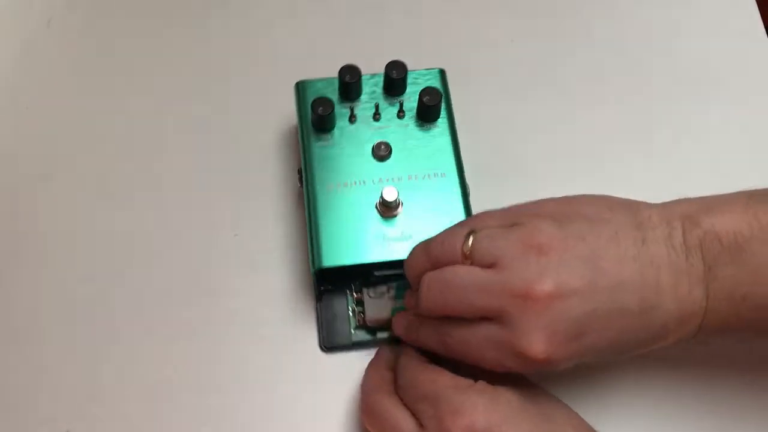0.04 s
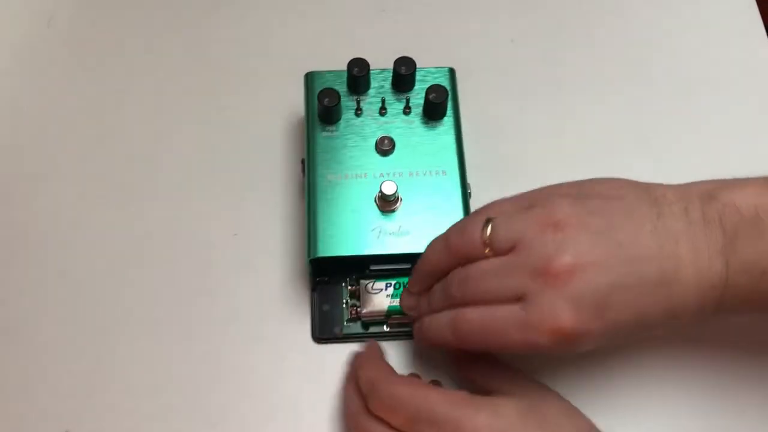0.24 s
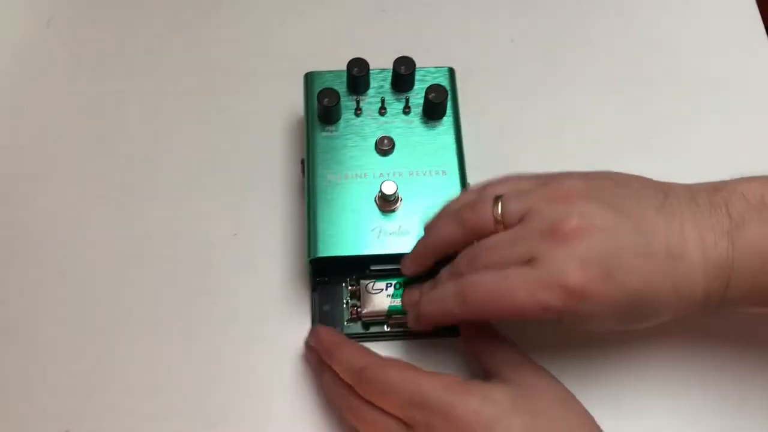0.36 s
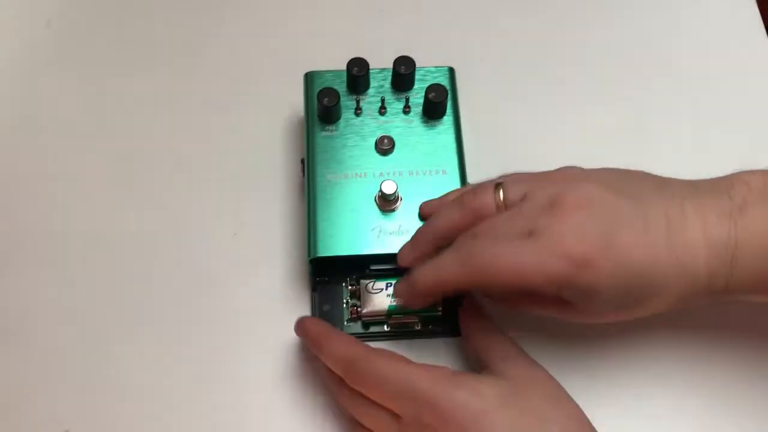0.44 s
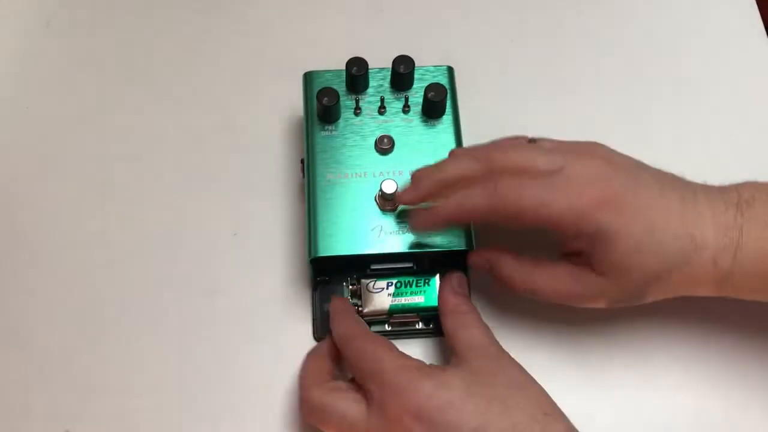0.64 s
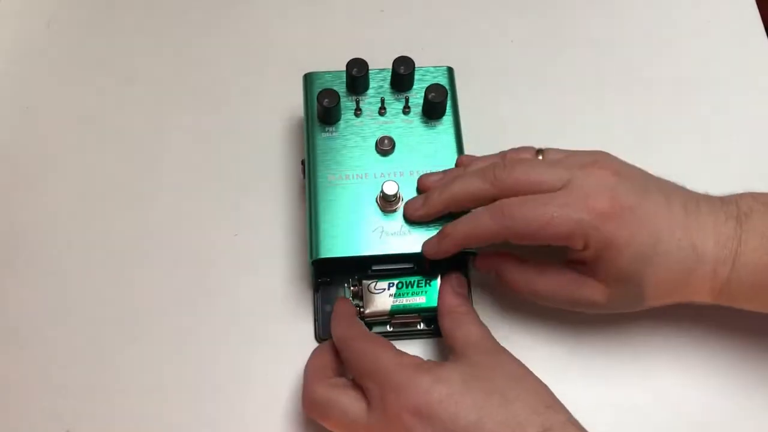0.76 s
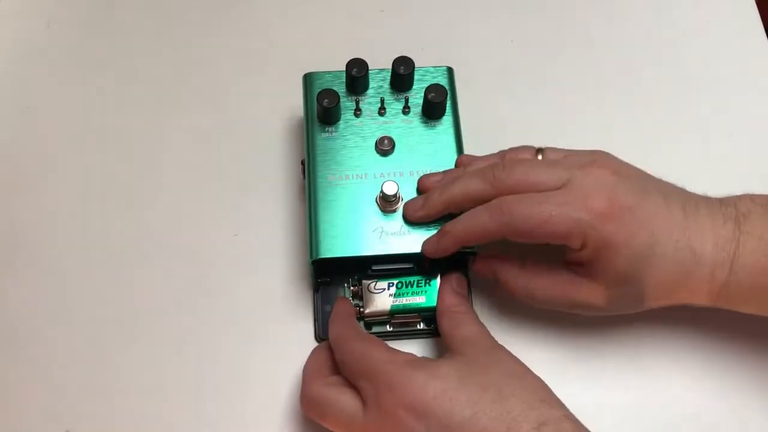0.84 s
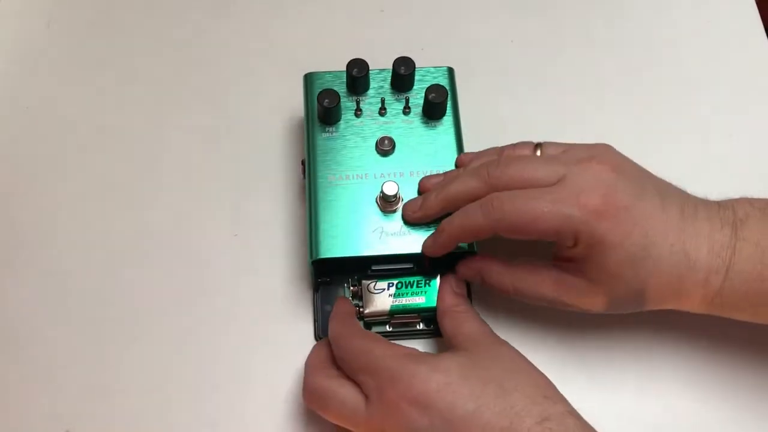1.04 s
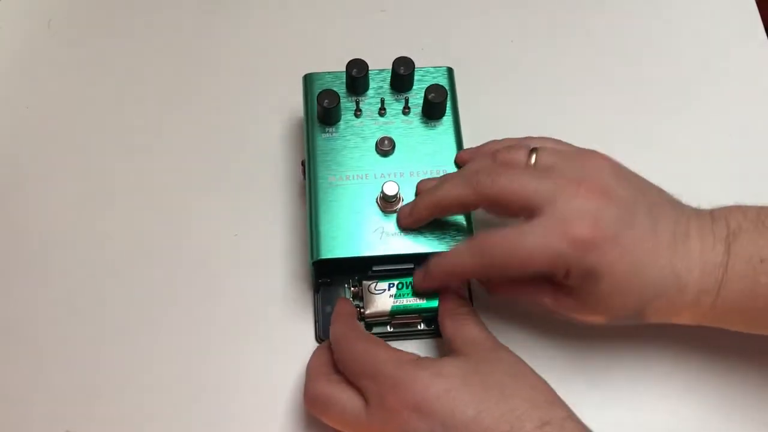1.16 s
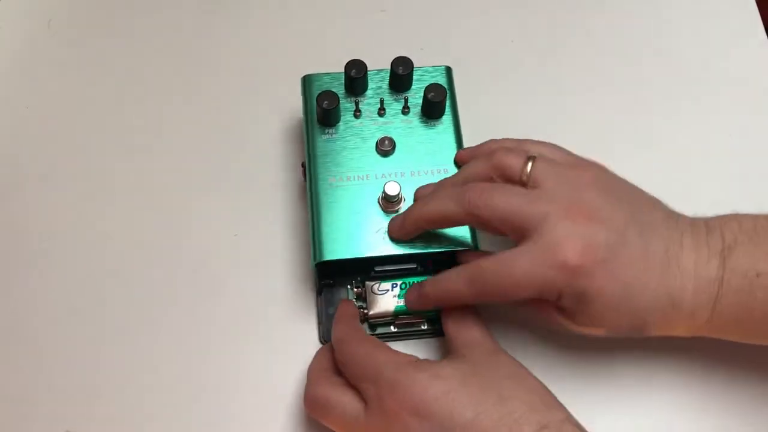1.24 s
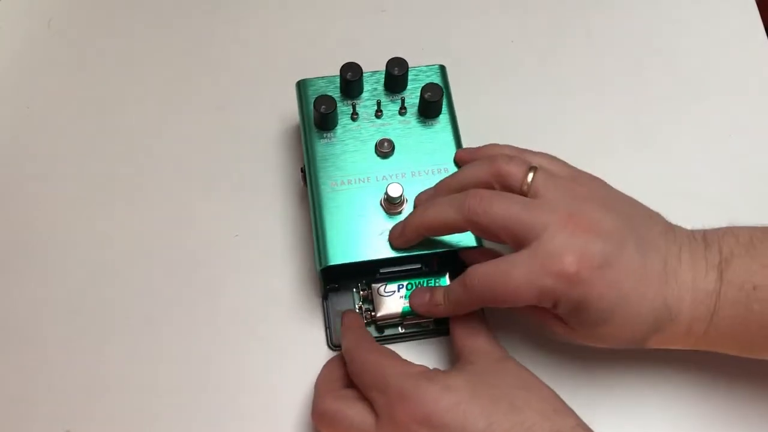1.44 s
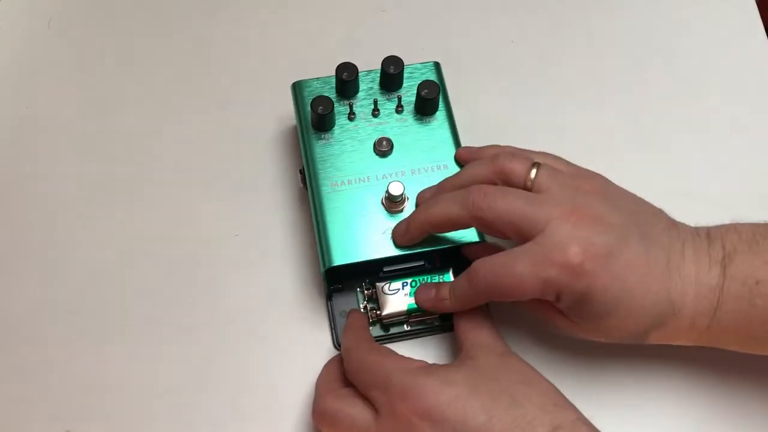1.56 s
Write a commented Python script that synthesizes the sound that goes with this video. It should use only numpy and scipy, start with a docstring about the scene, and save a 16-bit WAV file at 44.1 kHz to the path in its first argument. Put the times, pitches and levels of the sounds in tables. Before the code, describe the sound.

A small battery snaps into a plastic tray with sharp clicks, then faint ticks and rubbing

```python
"""Fingers press a small battery into the plastic tray of a metal box on a table, in a quiet small room.
Room tone and rubbing fingertips (shaped noise) come first, over the rumble of hands on the table top.
Two sharp snaps follow in the first quarter second, then lighter ticks: decaying noise through the tray,
a short ping and ringing housing modes, all with room sound. Soft thuds are decaying sines.
From 0.4 to 0.92 s the box slides a little: uneven noise through resonances."""
import sys
import numpy as np
from scipy import signal
from scipy.fft import rfft, irfft, next_fast_len
from scipy.io import wavfile
from scipy.ndimage import map_coordinates

SR = 44100
rng = np.random.default_rng(int(sys.argv[2]) if len(sys.argv) > 2 else 0)


def store_pcm(level_fs):
    """Save levels as 16-bit WAV."""
    pcm = np.round(np.clip(level_fs, -1, 1) * 32767).astype(np.int16)
    wavfile.write(sys.argv[1], SR, np.atleast_2d(pcm).T)


def ratio(d):
    """dB to gain"""
    e = np.asarray(d, float) / 20
    return 10 ** e


N = 70560  # samples, 1.6 s

# Color of the room tone. Each row: frequency in Hz, relative level in dB.
AIR_COLOR = [(15, -49.5), (25, -28.5), (66, -1.5), (113, -25.5), (152, -9.5), (410, -33), (445, -20),
             (495, -45), (826, -28.5), (1240, -38.5), (12500, -48.5), (15500, -57.5)]
# Loudness of fingertips on plastic and metal. Each row: time in seconds, level in dB.
RUB_LEVEL = [(0, -63.5), (.04, -74), (.06, -50.5), (.14, -54), (.19, -61), (.205, -46), (.23, -60),
             (.33, -62), (.48, -64.5), (.56, -58.5), (.64, -57.5), (.7, -60.5), (.8, -71.5), (.9, -77.5),
             (.96, -72.5), (1, -77), (1.1, -79.5), (1.14, -68), (1.17, -74.5), (1.2, -66), (1.23, -77.5),
             (1.255, -64.5), (1.28, -71.5), (1.3, -61), (1.34, -62.5), (1.36, -56.5), (1.385, -61.5),
             (1.42, -70), (1.46, -76), (1.53, -77.5), (1.555, -61.5), (1.6, -62)]
# Color of skin friction. Each row: frequency in Hz, relative level in dB.
SKIN_COLOR = [(120, -33.5), (200, -6), (345, -2), (923, -7), (1330, -7.5), (2090, -12), (2700, -11),
              (7090, -14.5), (13400, -21.5), (15500, -39)]
# Resonances the rubbing wakes. Each row: frequency in Hz, width in Hz, relative level in dB.
RUB_RESONANCES = [(723, 150, -3), (1385, 330, -2), (1880, 170, -1.5), (2750, 250, -2), (4000, 300, -10),
                  (5400, 300, -5)]
# Loudness of hands working on the table top. Each row: time in seconds, level in dB.
LEAN_LEVEL = [(0, -60), (.06, -68), (.1, -53.5), (.2, -63.5), (.26, -38), (.36, -66.5), (.5, -68.5),
              (.57, -58.5), (.66, -75), (.8, -61), (.88, -72.5), (1.2, -71.5), (1.33, -60.5), (1.42, -67),
              (1.6, -74)]
# Color of the table top's rumble. Each row: frequency in Hz, relative level in dB.
TABLE_COLOR = [(30, -26), (50, -1), (100, -0.5), (160, -6), (300, -7.5), (500, -13), (800, -46.5)]
# Pushes felt by the table top. Each row: start in seconds, level in dB, pitch in Hz,
# time to fall by 60 dB in seconds.
THUDS = [(0.072, -31.5, 160.6, 0.057), (0.086, -38, 49.6, 0.35), (0.234, -34, 157.1, 0.3),
         (.24, -36, 90.2, 0.27), (.24, -35.5, 44.2, 0.24), (0.246, -34.5, 259.7, 0.1),
         (.24, -39.5, 340.3, .12), (.24, -33.5, 546, .1), (.53, -48, 75.64, 0.16),
         (0.568, -44.5, 135.8, 0.15), (0.684, -39.5, 80, 0.25), (.74, -36, 87.1, 0.21),
         (0.749, -43.5, 140.7, 0.14), (1.232, -49.5, 119.3, .12), (1.299, -50.5, 69.9, .2),
         (1.325, -51, 150, 0.23), (1.579, -43.5, 334.4, 0.12)]
# Battery and tray contacts. Each row: start in seconds, level in dB, ping pitch in Hz,
# ping level relative to the contact in dB, treble tilt in dB per octave.
CONTACTS = [(.0518, -29.5, 12300, -22, 5.5), (.0687, -10, 2275, -11, -7.5), (.2039, -35, 2750, -4.5, 17.5),
            (.2212, -28, 7660, 2, 1), (.2278, -26, 5400, -3, 5), (.2342, 1.5, 2750, -6.5, -1.5),
            (.2418, -8.5, 5750, 3.5, -9.5), (.2506, -12.5, 6563, 1.5, -5), (.5405, -39, 2840, 1.5, -5),
            (.6582, -27, 1865, 0, -12.5), (.7344, -37, 8950, -16, 0), (.7595, -48, 1985, -0.5, -8),
            (.9594, -57, 1763, -6, -14), (1.1372, -51.5, 3530, -3.5, -0.5), (1.1944, -54.5, 2352, -3.5, -7),
            (1.2504, -47, 3500, -6, -1), (1.3466, -37, 1402, -23, -5), (1.3664, -41.5, 2800, -6.5, 3),
            (1.4774, -56.5, 1130, -4.5, 2)]
# Broad resonances of the tray. Each row: frequency in Hz, width in Hz, relative level in dB.
TRAY_RESONANCES = [(355.9, 58, -17.5), (580, 150, -14.5), (929.7, 900, -15.5), (1540, 400, -14.5),
                   (2100, 1200, -6.5), (2750, 170, -19.5), (3810, 780, -4), (4900, 1000, -7.5),
                   (5370, 310, -2), (7000, 900, -2.5), (8717, 1000, -3), (12300, 2500, -8.5)]
# Ringing modes of the housing. Each row: pitch in Hz, relative level in dB,
# time to fall by 60 dB in seconds.
HOUSING_MODES = [(736.7, -25, 0.22), (769.8, -24, .24), (997, -20.5, .07), (1282.7, -30, 0.091),
                 (1472, -20.5, 0.048), (1933, -22, 0.039), (2493, -23.5, 0.04), (2613, -28.5, .12),
                 (2820, -24.5, 0.081), (3556, -30.5, .1), (5926, -28, 0.065), (6670, -31, .08)]
# How long the room rings. Each row: frequency in Hz, time to fall by 60 dB in seconds (fast part).
ROOM_DECAY = [(200, .15), (800, 0.11), (2500, 0.13), (6000, 0.096), (12000, 0.085)]
# Loudness of the box sliding on the table. Each row: time in seconds, level in dB.
SLIDE_LEVEL = [(.4, -76), (.5, -68), (.6, -63), (.67, -49), (.72, -60.5), (.76, -60), (.79, -59.5),
               (.84, -62.5), (.89, -65.5), (.92, -79.5)]
# Resonances of the sliding box. Each row: frequency in Hz, width in Hz, relative level in dB.
SLIDE_RESONANCES = [(1277.5, 60, 5), (750, 40, -12.5), (1594, 270, -19.5), (335, 52, -13.5)]
# Response of the microphone. Each row: frequency in Hz, gain in dB.
MIC_RESPONSE = [(25, -11.5), (45, 0.5), (14000, 4), (15000, -12.5), (16000, -21)]


def unit(x):
    """Scales a sound to rms 1."""
    return x / np.sqrt(np.mean(x ** 2) + 1e-20)


def along(points, hz):
    """Reads a table of (Hz, value) points along a logarithmic frequency axis."""
    f, v = np.transpose(points)
    return np.interp(np.log(hz + 1), np.log(f + 1), v)


def curve(rows):
    """Draws a (seconds, dB) table sample by sample, silent outside it unless it reaches the end."""
    s, db = np.transpose(rows)
    after = db[-1] if s[-1] > N / SR - .05 else -120
    return np.interp(np.arange(N) / SR, s, db, left=-120, right=after)


def wobble(rate, size=N):
    """Makes a smooth random curve with `rate` random points a second."""
    points = rng.standard_normal(int(size * rate / SR) + 4)
    return map_coordinates(points, [np.arange(size) * rate / SR])


def filtered(x, response):
    """Shapes x by a response given as a function of frequency."""
    m = next_fast_len(len(x) + 8192)  # spare room for the ringing
    return irfft(rfft(x, m) * response(np.fft.rfftfreq(m, 1 / SR)), m)[:len(x)]


def resonances(peaks, f):
    """Adds up resonances, each strongest at its own frequency, with alternating signs."""
    total = 0
    for k, (center, width, db) in enumerate(peaks):
        damping = 1j * f * width
        total = total + (-1) ** k * ratio(db) * damping / (center * center - f * f + damping)
    return total


def air():
    """Steady room tone: shaped noise with a slightly wavering level."""
    level = ratio(-64.5 + 1.5 * wobble(2))
    tone = filtered(rng.standard_normal(N), lambda f: ratio(along(AIR_COLOR, f)))
    return level * unit(tone)


def fingers():
    """Soft skin friction is grainy noise that follows the hands' movement and wakes resonances."""
    grain = rng.standard_normal(N) * ratio(2.5 * wobble(350))

    def color(f):
        woken = ratio(1.5) * abs(resonances(RUB_RESONANCES, f))
        return ratio(along(SKIN_COLOR, f)) * (1 + woken)

    return ratio(curve(RUB_LEVEL)) * unit(filtered(grain, color))


def table():
    """Soft pushes set the table top's low modes going, over the rumble of hands leaning on it."""
    thuds, t = np.zeros(N + SR), np.arange(SR // 2) / SR
    rise = 1 - np.exp(-t / 0.0021)  # soft start, time constant in seconds
    for start, db, hz, t60 in THUDS:
        thud = ratio(db - 60 * t / t60) * rise * np.sin(2 * np.pi * hz * t)
        thuds[round(start * SR):][:len(t)] += thud
    rumble = filtered(rng.standard_normal(N), lambda f: ratio(along(TABLE_COLOR, f)))
    return thuds[:N] + ratio(curve(LEAN_LEVEL)) * unit(rumble)


def tilt(f, treble_db):
    """Raises or lowers the treble, reaching treble_db per octave well above 4000 Hz."""
    return (1 + 1j * f / 4000) ** (treble_db / np.log2(64))


def tray_snap(t, db, treble_db):
    """A short noisy rattle through the tray's resonances; harder contacts rattle longer."""
    t60 = .03 * ratio(0.64 * db)  # seconds; 0.03 at 0 dB
    spiky_db = 0  # random level swings; 0 leaves the noise even
    rattle = rng.standard_normal(len(t)) * ratio(spiky_db * wobble(900, len(t)) - 60 * t / t60)
    snap = filtered(rattle, lambda f: tilt(f, treble_db) * resonances(TRAY_RESONANCES, f))
    # Scale by total energy over decay length, so long and short snaps start about equally strong.
    return snap / np.sqrt(np.sum(snap ** 2) / (t60 * SR / 14))


def contact_ping(t, hz, ping_db):
    """A single pitch that falls by 60 dB in 27 cycles, with a quick soft start."""
    fade = ratio(ping_db - 60 * t * hz / 27)
    return fade * np.sin(2 * np.pi * hz * t) * (1 - np.exp(-t / 0.00033))


def housing_ring(t, hz, treble_db):
    """Decaying sines of the housing, boosted most near the contact's own pitch."""
    ring = np.zeros(len(t))
    for k, (f, db, t60) in enumerate(HOUSING_MODES):
        octaves_away = np.log2((f + 1) / hz)
        focus_db = 7 * np.exp(-.5 * (octaves_away / 0.18) ** 2)
        scatter_db = rng.normal(0, 1.5)
        level = abs(tilt(f, treble_db)) * ratio(db + focus_db + scatter_db - 60 * t / t60)
        ring += (-1) ** k * level * np.sin(2 * np.pi * f * t)
    return ring * (1 - np.exp(-t / .001))


def room(x):
    """A fresh diffuse tail with a fast and a slow part; each frequency dies at its own speed."""
    hz, t, noise = signal.stft(rng.standard_normal(SR // 2), SR, nperseg=256)
    fall_db = -60 * t / along(ROOM_DECAY, hz)[:, None]
    fade = ratio(fall_db) + ratio(-12.5 + fall_db / 2.3)  # the second part is weaker and slower
    tail = signal.istft(noise * fade, SR, nperseg=256)[1]
    delayed = np.pad(x, (round(.004 * SR), 0))  # 4 ms
    return signal.fftconvolve(delayed, tail / np.linalg.norm(tail))[:len(x)]


def contacts():
    """Each contact adds a tray snap, a ping and a housing ring, with their room sound."""
    out, t = np.zeros(N + SR), np.arange(SR // 2) / SR
    for start, db, hz, ping_db, treble_db in CONTACTS:
        snap = ratio(db - 10.5) * tray_snap(t, db, treble_db)
        hit = snap + ratio(db) * contact_ping(t, hz, ping_db)
        # The ring grows by 0.8 dB for each dB of the contact.
        ring = ratio(.8 * db - 6) * housing_ring(t, hz, treble_db)
        echo = ratio(-6.5) * room(hit + .5 * ring)  # half of the ring reaches the room
        out[round(start * SR):][:len(t)] += hit + ring + echo
    return out[:N]


def slide():
    """Uneven friction under the box excites its cavity and housing."""
    friction = rng.standard_normal(N) * ratio(wobble(79))
    return ratio(curve(SLIDE_LEVEL)) * unit(filtered(friction, lambda f: resonances(SLIDE_RESONANCES, f)))


def scene():
    """Adds all sources together at one microphone."""
    return (contacts() + table() + slide() + fingers() + air())[None]


def band_limit(x):
    """A steep low-pass at the top of the band."""
    return signal.sosfilt(signal.butter(12, 16270, fs=SR, output="sos"), x)


def record(dry):
    """The camera's microphone colors the sound, and soft clipping rounds off its loudest peaks."""
    x = filtered(dry[0], lambda f: ratio(along(MIC_RESPONSE, f)))
    ceiling, knee = .95, 4  # full scale is 1; a larger knee bends more sharply
    mix = x / (1 + abs(x / ceiling) ** knee) ** (1 / knee)
    return band_limit(mix[None])


dry = scene()
out = record(dry)
store_pcm(out)
```